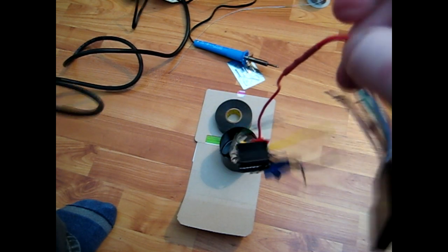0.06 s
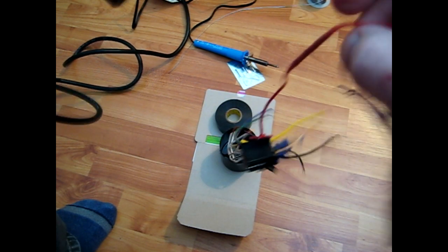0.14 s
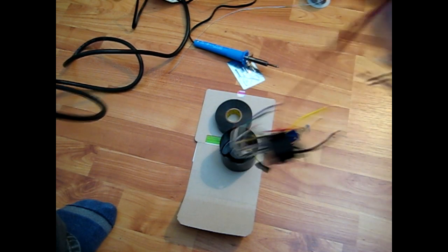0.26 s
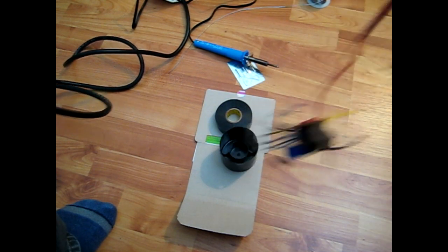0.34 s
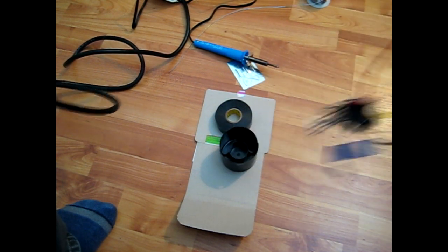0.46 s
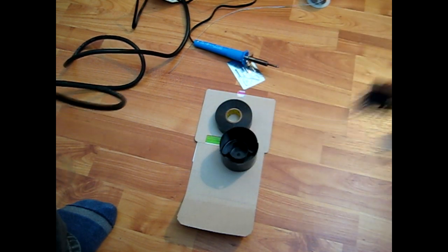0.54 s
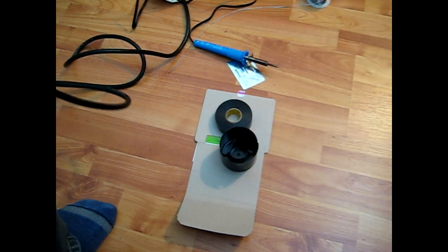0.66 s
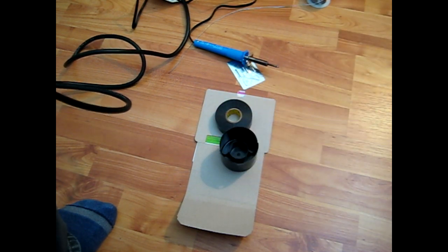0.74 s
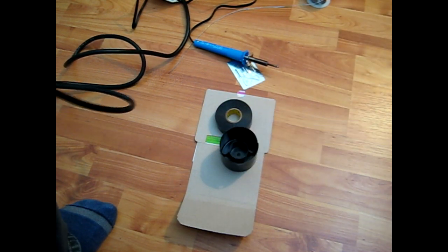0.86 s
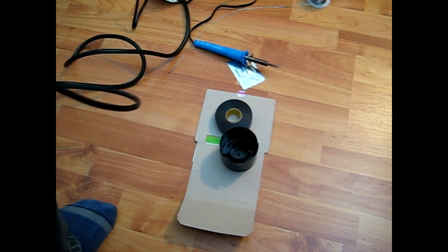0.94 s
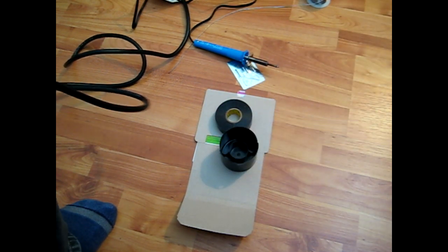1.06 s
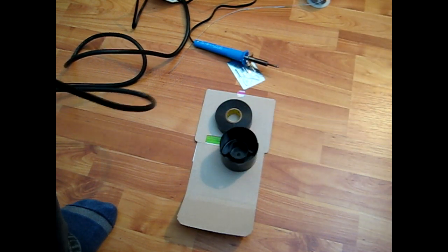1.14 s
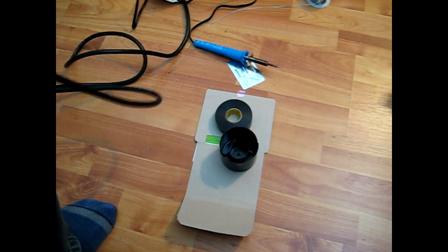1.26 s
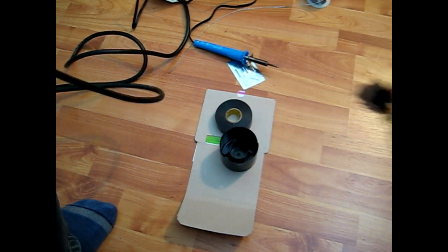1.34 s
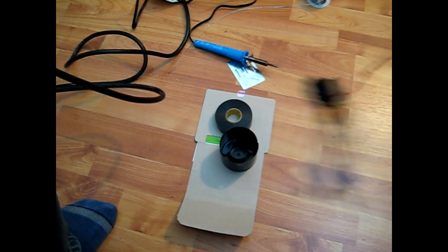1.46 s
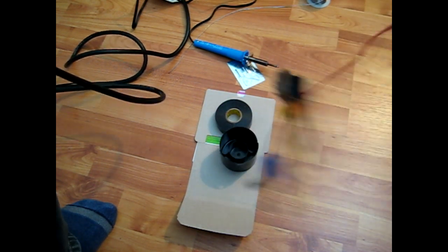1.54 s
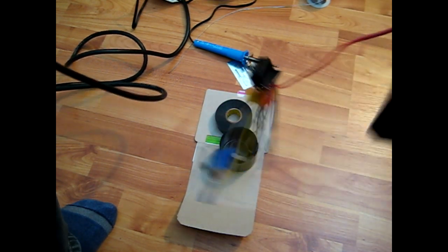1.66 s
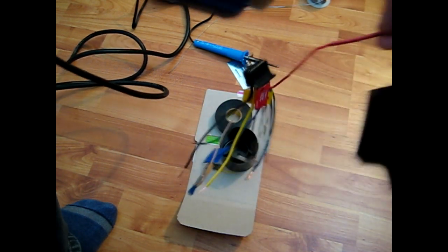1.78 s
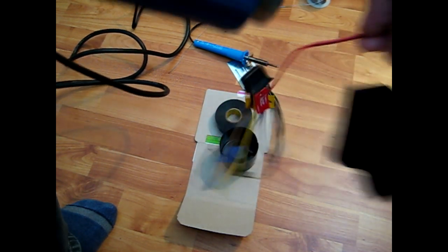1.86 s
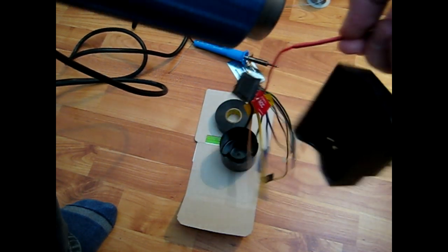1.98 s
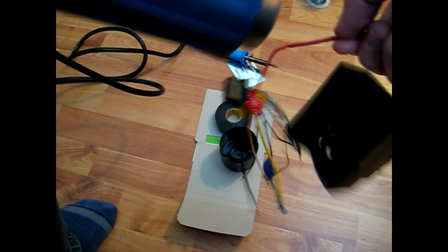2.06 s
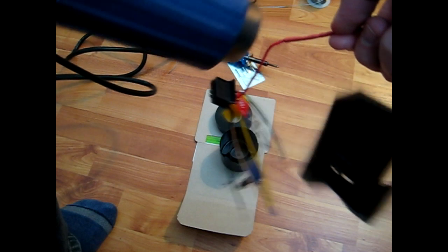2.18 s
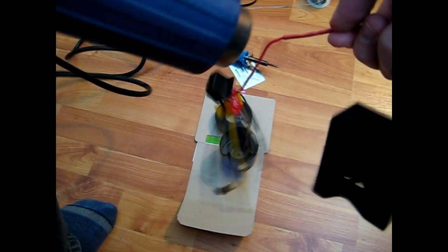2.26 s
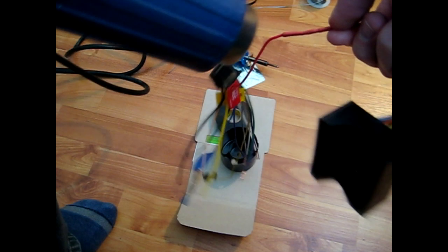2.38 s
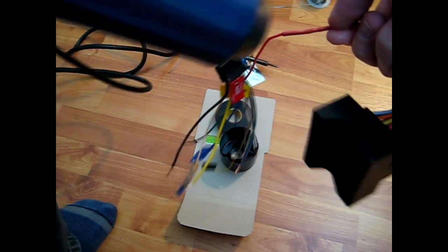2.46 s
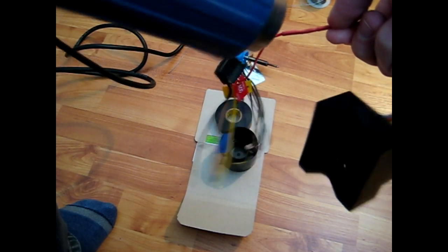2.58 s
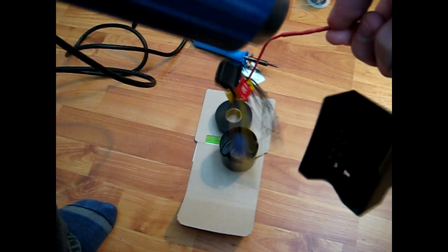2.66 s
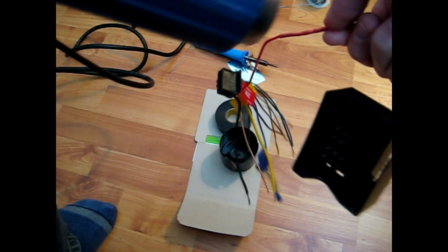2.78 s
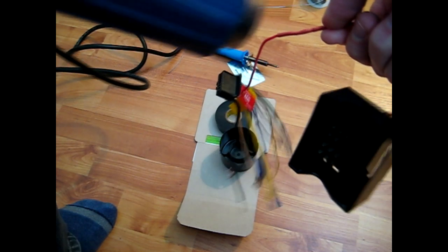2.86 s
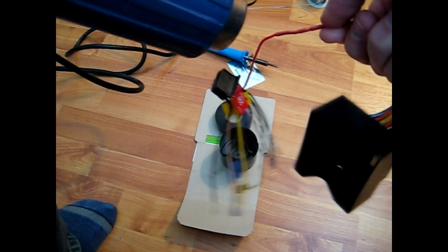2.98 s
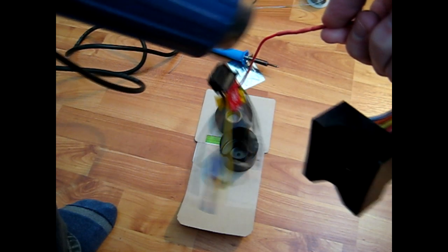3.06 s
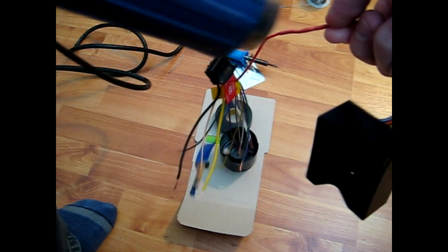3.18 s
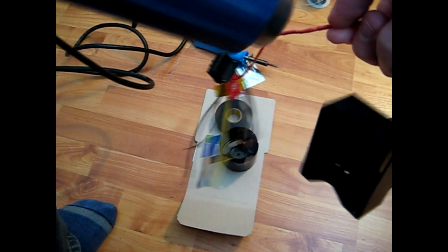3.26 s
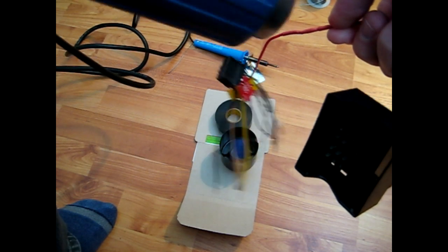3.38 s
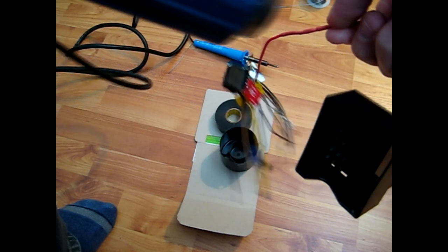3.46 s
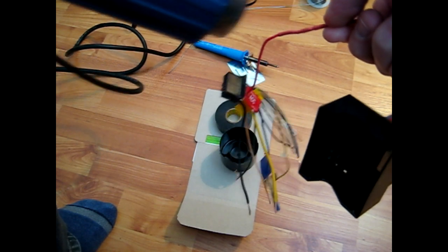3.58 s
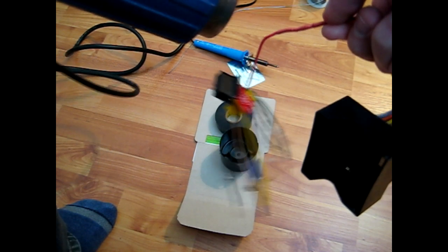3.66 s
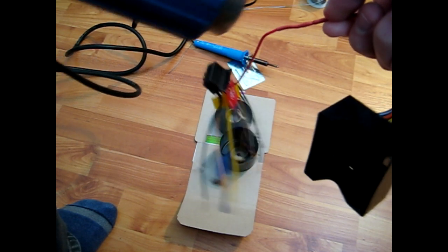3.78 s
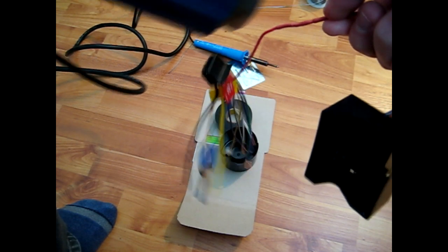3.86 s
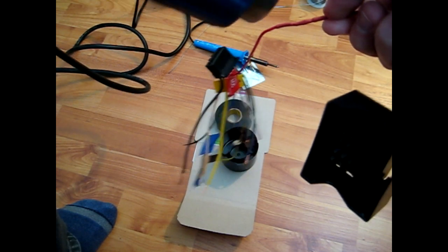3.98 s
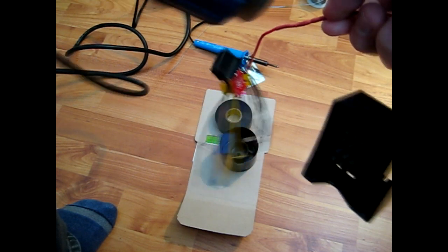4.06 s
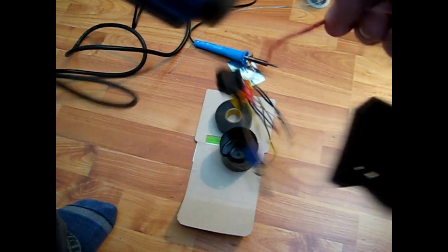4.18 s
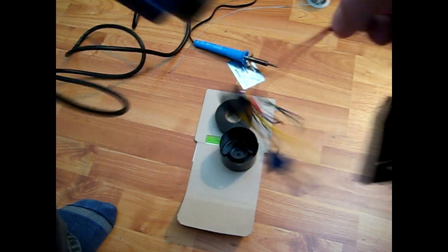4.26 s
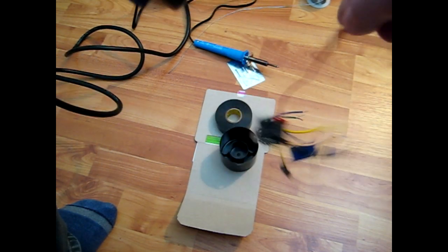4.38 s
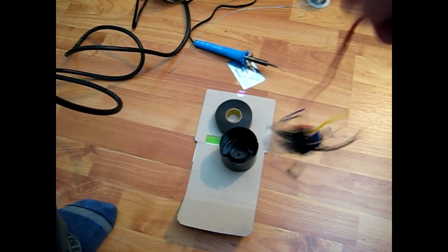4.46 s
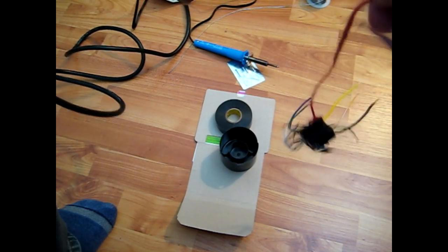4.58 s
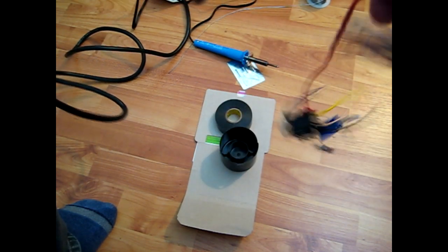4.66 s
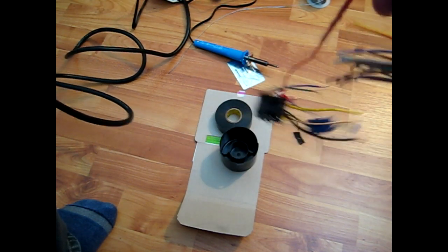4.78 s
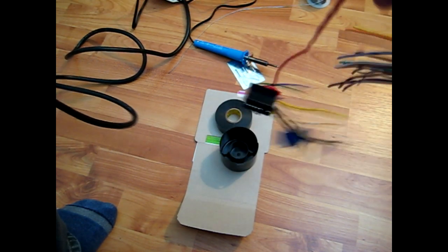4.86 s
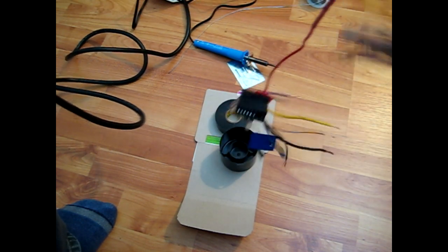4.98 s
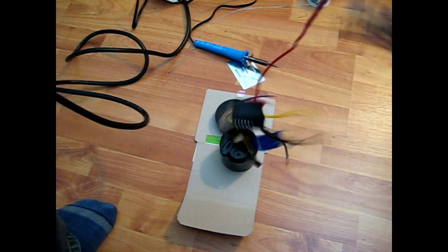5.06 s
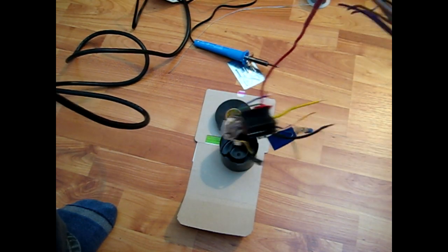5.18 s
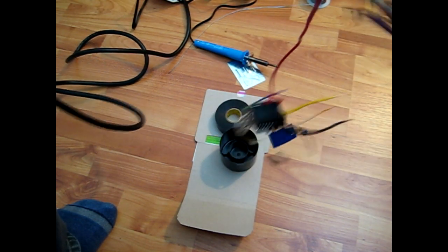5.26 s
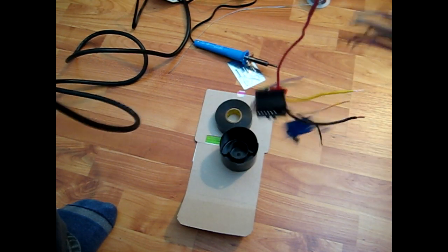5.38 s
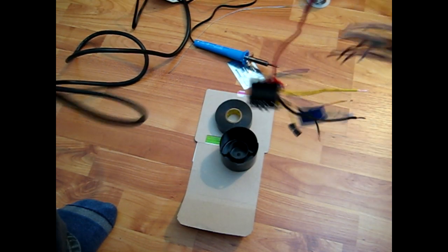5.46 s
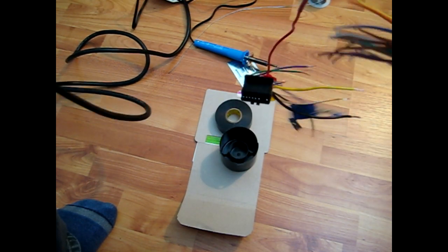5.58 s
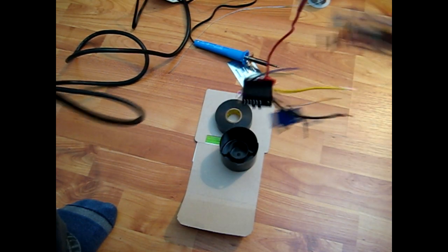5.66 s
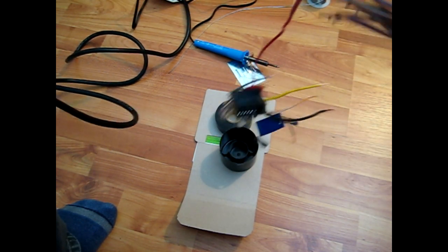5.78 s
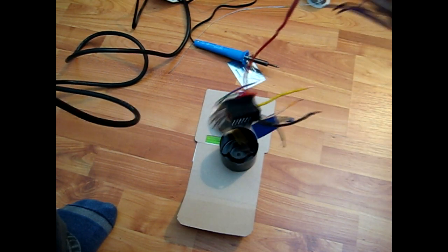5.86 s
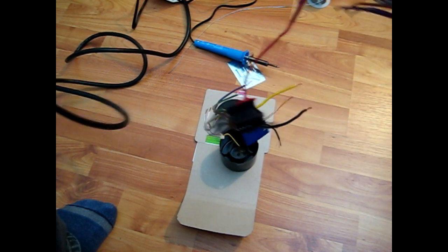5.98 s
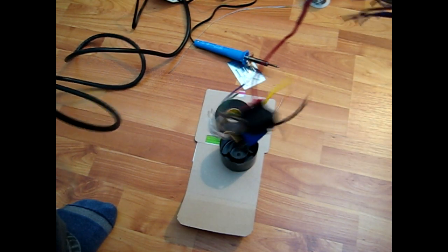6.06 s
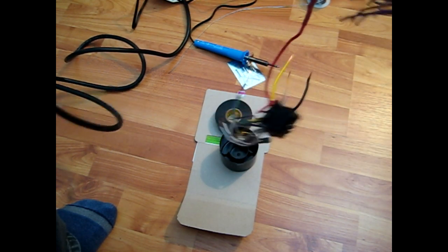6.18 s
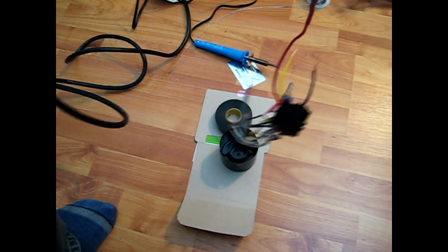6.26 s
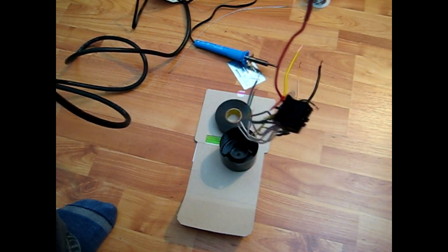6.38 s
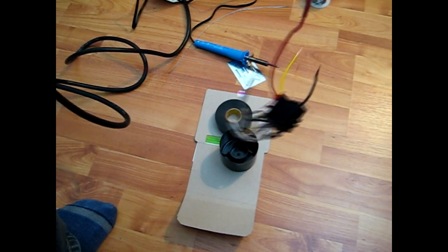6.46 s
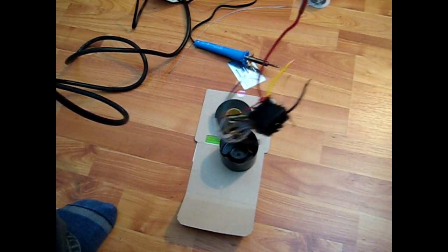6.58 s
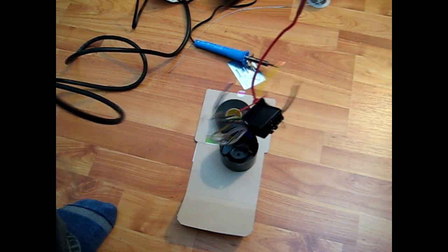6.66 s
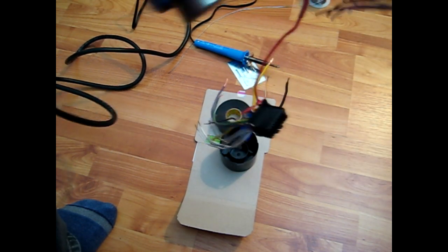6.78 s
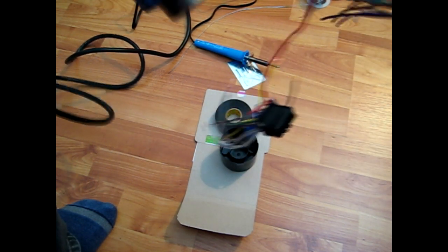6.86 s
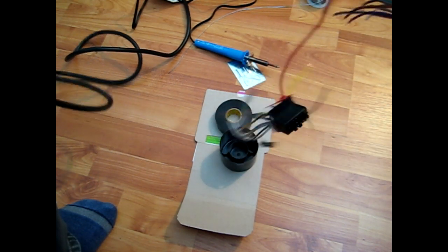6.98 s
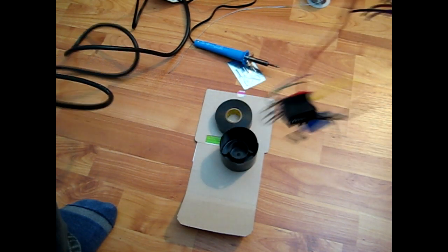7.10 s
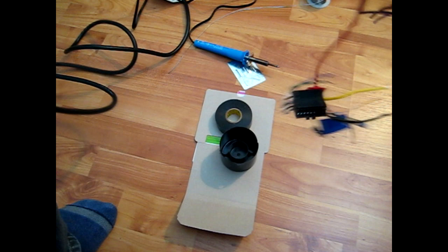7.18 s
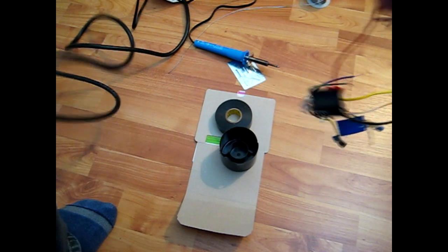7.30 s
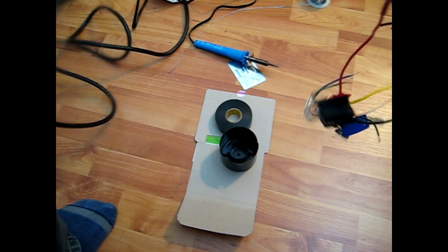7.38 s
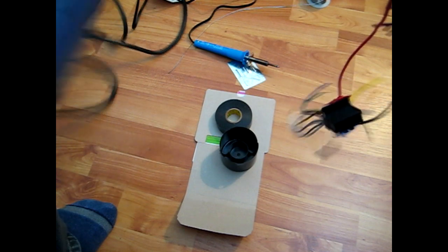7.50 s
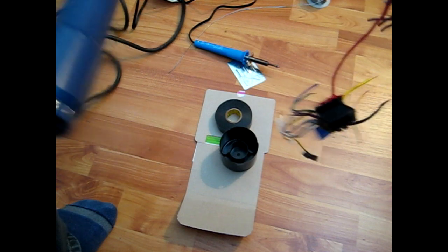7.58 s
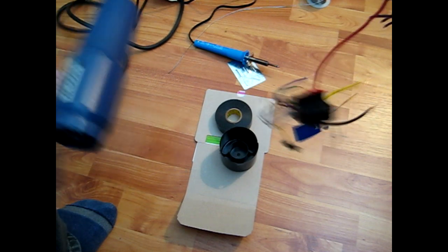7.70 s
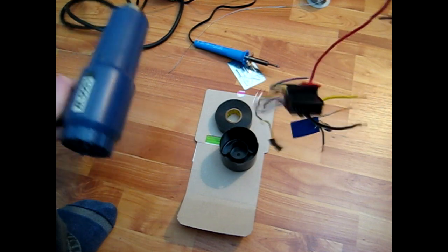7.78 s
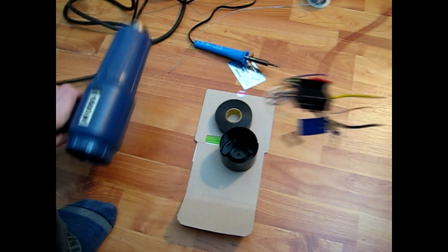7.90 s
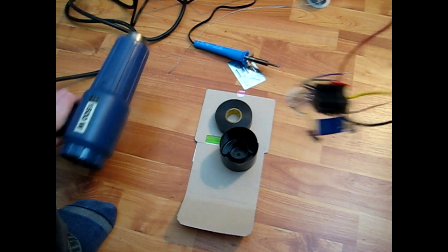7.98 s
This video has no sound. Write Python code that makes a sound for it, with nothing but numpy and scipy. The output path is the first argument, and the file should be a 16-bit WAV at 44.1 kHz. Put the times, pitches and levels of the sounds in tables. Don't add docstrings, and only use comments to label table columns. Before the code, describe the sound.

Close to the microphone in a quiet room, an electric heat gun blows a steady airy roar with a fan and motor whine, its tone shifting slightly as it moves. Late on, the power cuts, the whine slides down and the air collapses. The plastic casing then knocks sharply on the wooden floor, scrapes briefly, taps again and gives a thin squeak.

```python
import sys
import numpy as np
from scipy import signal
from scipy.io import wavfile
from scipy.ndimage import uniform_filter1d

SR = 44100
rng = np.random.default_rng(int(sys.argv[2]) if len(sys.argv) > 2 else 0)


def boost(x):
    u = np.asarray(x, float) / 20
    return 10 ** u


def generate_wav(signal):
    frames = np.transpose(np.atleast_2d(signal))
    scaled = np.clip(frames, -1, 1) * 32767
    pcm = np.round(scaled).astype(np.int16)
    wavfile.write(sys.argv[1], SR, pcm)


N = 354123

# (frequency [Hz], density [dB per Hz])
ROOM = [(18, -36), (60, -15), (150, -15.5), (300, -9), (600, -11), (1100, -11.5), (2100, -20), (3000, -26),
        (4500, -25), (7000, -23), (15000, -37)]
# (frequency [Hz], level [dB])
HUM = [(355.3, -43), (293, -49.5), (448, -76), (7558, -54.5)]
ROOM_DB = -42

# (time [s], pitch of third partial [Hz], level [dB])
SQUEAK = [
    (7.86, 5520, -52),
    (7.878, 5662, -41),
    (7.93, 5810, -35),
    (7.974, 5730, -31.5),
    (8.004, 5800, -46),
    (8.03, 5818, -48),
]
# (multiple, level [dB])
SQUEAK_PARTIALS = [(3, 0), (5, -30), (6, -31), (7, -36)]
# (time of full pressure [s], level [dB], rise [dB/s], fall [dB/s])
STROKES = [
    (7.445, -29.5, 900, 150),
    (7.5, -26.5, 170, 130),
    (7.625, -37, 60, 300),
    (7.8, -37.5, 300, 200),
    (7.4, -40, 10, 26),
    (7.84, -43, 4, 130),
]
# (frequency [Hz], density [dB per Hz])
RASP = [(120, -43), (300, -10), (600, 0), (1200, 1), (2200, -0.5), (3000, -0.5), (4200, 3.5), (5600, 0.5),
        (8000, -14), (14000, -29)]
# (time [s], peak [dB], casing ring [dB], floor ring [dB])
KNOCKS = [(7.4366, 3, -2.5, -6.5), (7.4376, -4, 2, -11), (7.4394, -1.5, 4, -18), (7.4427, -12.5, -3, -6),
          (7.4615, -19, 0, -12), (7.5117, -12, 3, -15), (7.7903, -11.5, -3.5, 0.5), (7.7928, -19, -1, -4),
          (7.7952, -19, -5, 2), (7.803, -27, -10, 2), (7.856, -27, -13, 2), (7.14, -21, 0, -6)]
# (frequency [Hz], level [dB], decay by 60 dB [s])
CASING = [(1800, -9, .006), (2270, -7, .008), (2900, -4, .007), (3440, -1, .009), (4100, -2, .012),
          (4900, -6, .008), (6200, -10, .005), (8260, -11, .005), (11000, -16, .004)]
# (frequency [Hz], level [dB], decay by 60 dB [s])
BOARDS = [(486, -14, 0.038), (720, -10.5, 0.028), (1000, -3, 0.014), (1350, -2, 0.01)]
SNAP_DB, SNAP_S = 2, .00006

# (time [s], speed [turns/s])
SPEED = [(0.03, 194.3), (0.17, 193.6), (0.84, 194.0), (1.57, 193.7), (2.47, 195.1), (3.49, 195.4),
         (3.91, 195.1), (4.08, 195.7), (4.72, 194.0), (5.65, 193.6), (6.0, 192.6), (6.61, 192.2)]
OFF_S, COAST_S, SET_DOWN_S = 6.625, .518, 7.42
LEAD = dict(order=(8, 16, 15, 45, 40, 5))
# (level [dB], change turned to the work [dB])
LEAD_DB = [(-28, -1.5), (-29.5, -2.5), (-35.5, -1), (-39.5, 4.5), (-42.5, -0.5), (-48, 6)]
# (multiple, time [s], half length [s], change [dB])
SWELLS = [(8, .35, .6, -9), (16, 1, .25, 4), (16, 6, .25, 4), (16, 3.75, .5, -3), (15, 1.6, .4, -8),
          (15, 3.35, .3, -5), (15, 6.4, .5, -8), (15, 4.5, .2, 4), (15, 5.4, .3, 3), (45, 0, .2, -5),
          (45, 1, .2, -5), (45, 1.75, .25, -10), (45, 2.15, .35, 3), (45, 4.35, .3, -4), (45, 5, .3, 4),
          (45, 6.3, .25, -5), (40, 1.35, .3, 4), (40, 1.8, .25, -7), (40, 4.35, .25, 4), (40, 4.85, .3, -4),
          (5, 1.1, .5, -4), (5, 6.3, 1.2, 11)]
WHINE = dict(first=28, last=77, knee=48)
WHINE_DB, WHINE_FALL_DB, WHINE_SCATTER_DB = -48, .72, 2.5
# (multiple, level [dB])
SLOTS = [(32, -43), (35, -42), (42, -41), (44, -45), (54, -48), (55, -48), (60, -51)]
# (multiple, level [dB])
FAINT = [(9, -47), (10, -51), (13, -48), (14, -53), (17, -45), (20, -47), (25, -50), (80, -66), (85, -72),
         (90, -70)]
# (multiple, level [dB])
BARS = [(14, -42), (20, -38), (30, -34), (35, -42), (48, -45), (52, -45), (55, -44), (80, -45), (90, -47)]
# (frequency [Hz], width [Hz], level [dB])
SHELL = [(2600, 400, 3), (6300, 500, 5), (7500, 400, 2), (9000, 800, 6), (10500, 900, 7)]
FREED_DB, FREED_S, FADE_DB_PER_S2 = 1, .07, 100
BLADE_FALL = 1.0
BLADE_BARREL, BLADE_PIPE = (1270, 220, 10), (590, 50, 6)
BLADE_END_S, BLADE_END_DB_PER_S = 7.17, 170
TICK_S, TICK_DB, TICK_RISE, TICK_FALL = 7.29, -34, 90, 120

# (time [s], flow [dB], nozzle toward the work [0-1], barrel whistle [dB],
# nozzle hump [Hz], nozzle hump [dB])
HOLD = [(0, -18, 0.02, -2, 5240, -18), (.3, -18, 0.28, 0, 5100, -1), (.7, -20, 0.17, -0.5, 4020, 5),
        (1.05, -20, 0, 2.5, 4000, -1), (1.4, -18, 0.17, 1, 4000, -3), (1.8, -17.5, 0.52, 1.5, 4180, -2.5),
        (2.4, -17.5, 0.74, -1, 4100, -7), (2.9, -16.5, 0.9, -3.5, 4060, -10),
        (3.3, -18, .9, 0.5, 3900, -2.5), (3.75, -17.5, 1, 0, 4020, -2), (4.1, -18, 0.4, 2.5, 4250, -7),
        (4.4, -19.5, 0, 4.5, 4300, -5), (4.8, -20, 0.09, 3.5, 4300, 0.5), (5.3, -20, 0.13, 2.5, 4400, 2.5),
        (5.9, -19.5, 0.25, 0, 4300, 2), (6.3, -19.5, 0.18, -1, 4160, 0.5), (6.62, -17.5, 0.4, -2, 4230, -5)]
# (frequency [Hz], density [dB per Hz])
STREAM = [(30, -36), (180, -36), (420, -15.5), (800, -13.5), (1150, -6.5), (1600, -17.5), (2100, -12.5),
          (2350, -17), (2600, -13), (4400, -11.5), (5600, -19.5), (6300, -19.5), (9600, -25), (15000, -37)]
# (as a rule [dB], turned to the work [dB], early coast [dB], late coast [dB])
ANSWER = dict(flow=(0, 0, -2.5, -15.5), pipe=(-1, 5, 15.5, -2.5), barrel=(0, 0, 3.5, -29),
          grille=(3, -20.5, 5.5, -30), vent=(2.5, -4.5, -17, 6), nozzle=(0, 1, -16, -11),
          dip=(2, 0.7, 3, -9), bright=(-2, 0.5, 7, 5.5))
# (time [s], half length [s], depth [dB])
SHADOWS = [
    (.4, 0.25, 6),
    (2.094, 0.43, 6),
    (3.7, 0.34, 2.5),
    (4.7, 0.41, 2),
]
EARLY_S, LATE_S = 0.24, 0.38
PIPE, BARREL = (560, 150, -7), (1282, 85, 13)  # (Hz, width Hz, dB)
GRILLE, VENT = (3260, 790, 2.1), (4950, 200, -4.5)  # (Hz, width Hz, dB)
DIP, NOZZLE_WIDTH = (3510, 730), 750
TOP_HZ, TOP_DB = 8800, 19

EDGE_HZ, CEILING = 15000, .92


def evened(x):
    return x / np.sqrt(np.mean(x ** 2) + 1e-20)


def read(points, hz):
    f, value = np.transpose(points)
    return np.interp(np.log(hz + 1), np.log(f + 1), value)


def columns(rows, t):
    s, *values = np.transpose(rows)
    return [np.interp(t, s, v) for v in values]


def add(mix, s, sound):
    part = mix[round(s * SR):][:len(sound)]
    part += sound[:len(part)]


def peak(t, s, db, rise, fall):
    return db - np.where(t < s, rise * (s - t), fall * (t - s))


def swell(t, s, half):
    return np.maximum(1 - abs(t - s) / half, 0)


def grid(size):
    hop = size // 4
    return np.fft.rfftfreq(size, 1 / SR)[:, None], np.arange(N // hop + 5) * hop / SR


def patches(shape, bins, frames):
    x = uniform_filter1d(rng.standard_normal(shape), size=bins, axis=0)
    return evened(uniform_filter1d(x, size=frames, axis=1))


def noise(height, patchy_db):
    a, b = rng.standard_normal((2,) + height.shape)
    size = 2 * len(height) - 2
    uneven = boost(patchy_db * patches(height.shape, bins=12, frames=16))
    z = (a + 1j * b) * height * uneven * np.sqrt(3 / size)
    return signal.istft(z, nperseg=size, noverlap=3 * size // 4)[1][:N]


def unit(height):
    return height / np.sqrt(np.mean(height ** 2, axis=0))


def hump(hz, centre_hz, width, db):
    return boost(db) ** 2 / (1 + (2 * (hz - centre_hz) / width) ** 2) ** 1.57


def room():
    hz, frames = grid(size=2048)
    t = np.arange(N) / SR
    hum = sum(np.sqrt(2) * boost(db) * np.sin(2 * np.pi * (f * t + rng.random())) for f, db in HUM)
    return hum + boost(ROOM_DB) * noise(unit(boost(read(ROOM, hz))) + 0 * frames, patchy_db=2.5)


def squeak():
    t = np.arange(SQUEAK[0][0], N / SR, 1 / SR)
    hz, level_db = columns(SQUEAK, t)
    turns = np.cumsum(hz) / SR / SQUEAK_PARTIALS[0][0]
    tone = sum(boost(db) * np.sin(2 * np.pi * k * turns) for k, db in SQUEAK_PARTIALS)
    fade_in = np.clip((t - t[0]) / .01, 0, 1)
    out = np.zeros(N)
    add(out, t[0], np.sqrt(2) * boost(level_db) * tone * fade_in)
    return out


def slide():
    hz, frames = grid(size=256)
    t = np.arange(N) / SR
    stroke_db = np.max([peak(t, *row) for row in STROKES], axis=0) + 5.0
    touching = np.clip((t - 7.3) / 0.059, 0, 1)
    rasp = noise(unit(boost(read(RASP, hz))) + 0 * frames, patchy_db=.5)
    return boost(stroke_db) * touching * rasp


def ringing(modes, t):
    out = np.zeros(len(t))
    for k, (f, db, t60) in enumerate(modes):
        hz = f * rng.uniform(0.93, 1.03)
        out += (-1) ** k * boost(db - 60 * t / t60) * np.sin(2 * np.pi * hz * t)
    return out


def knocks():
    out, t = np.zeros(N), np.arange(3000) / SR
    place = (t / SNAP_S - 3) ** 2
    flick = boost(SNAP_DB) * (1 - 2 * place) * np.exp(-place)
    for s, peak_db, casing_db, floor_db in KNOCKS:
        ring = boost(floor_db) * ringing(BOARDS, t) + boost(casing_db) * ringing(CASING, t)
        grit = uniform_filter1d(uniform_filter1d(rng.standard_normal(len(t)), size=4), size=3)
        crack = boost(-5 - 60 * t / .009) * grit
        onset = np.minimum(t / .0004, 1)
        blow = (ring / abs(ring).max() + crack) * onset - flick
        add(out, s, boost(peak_db) * blow)
    return out


def shaft(t):
    return columns(SPEED, t)[0] * np.exp(-np.maximum(t - OFF_S, 0) / COAST_S)


def lost_speed(t):
    return shaft(OFF_S) * (1 - np.exp(-np.maximum(t - OFF_S, 0) / COAST_S))


def freed(t):
    return np.clip((t - OFF_S) / FREED_S, 0, 1)


def coast_db(t):
    return FREED_DB * freed(t) - FADE_DB_PER_S2 * np.maximum(t - OFF_S - 2 * FREED_S, 0) ** 2


def leading_tones(t):
    lost_hz, since = lost_speed(t), np.maximum(t - OFF_S, 0)
    turned = columns(HOLD, t)[1]
    held = {k: db + turned_db * turned for k, (db, turned_db) in zip(LEAD["order"], LEAD_DB)}
    for k, s, half, db in SWELLS:
        held[k] = held[k] + db * swell(np.minimum(t, OFF_S), s, half)
    paths = {}
    for k, db in held.items():
        low_db = (k < 20) * lost_hz / 8
        echo = .6 + .4 * np.exp(2j * np.pi * k * lost_hz * .003)
        paths[k] = boost(db + coast_db(t) - low_db) * np.exp(2j * np.pi * rng.random()) * echo
    blades = LEAD["order"][0]
    blade_hz = blades * shaft(t)
    lit = np.sqrt(1 + (since > 0) * (hump(blade_hz, *BLADE_BARREL) + hump(blade_hz, *BLADE_PIPE)))
    blade = boost(peak(t, BLADE_END_S, held[blades], 0, BLADE_END_DB_PER_S))
    paths[blades] = blade * np.exp(-BLADE_FALL * since / COAST_S) * lit
    return paths


def whine_tones(t):
    many = np.arange(WHINE["first"], WHINE["last"] + 1)
    fall_db = WHINE_FALL_DB * np.maximum(many - WHINE["knee"], 0)
    comb_db = WHINE_DB - fall_db + WHINE_SCATTER_DB * rng.standard_normal(len(many))
    levels = {**dict(zip(many.tolist(), comb_db)), **dict(FAINT + SLOTS)}
    paths = {}
    for k, db in levels.items():
        rate, delay, phase = rng.random((3, 6, 1))
        cycles = 2.4 * (2 * rate - 1) * t + 0.00179 * delay * k * lost_speed(t) + phase
        paths[k] = boost(db + coast_db(t)) * np.exp(2j * np.pi * cycles).sum(0) / np.sqrt(len(rate))
    return paths


def brush_ticks(t, turns):
    level_db = peak(t, TICK_S, TICK_DB, TICK_RISE, TICK_FALL) + 5.3 * rng.standard_normal(len(t))
    ticks = np.diff(np.floor(turns), prepend=0) * boost(level_db)
    ring = boost(-60 * t[:900] / 0.046) * np.sin(2 * np.pi * 6600 * t[:900])
    return signal.oaconvolve(ticks, ring)[:len(t)]


def motor():
    t, slow = np.arange(round(SET_DOWN_S * SR)) / SR, np.arange(0, 7.5, 1 / 200)
    flutter = uniform_filter1d(rng.standard_normal(len(t)), size=1500)
    flutter = evened(uniform_filter1d(flutter, size=1500))
    turns = np.cumsum(shaft(t) + .07 * flutter) / SR
    paths = {**whine_tones(slow), **leading_tones(slow)}
    lost_hz = lost_speed(slow)
    for k, db in BARS:
        echo = .6 + .2 * np.cos(np.pi * k * lost_hz * .003 + 6 * rng.random())
        paths[k] = paths[k] + boost(db + coast_db(slow)) * np.clip(lost_hz / 110, 0, 1) ** 2 * echo
    for k in paths:
        rough = evened(uniform_filter1d(rng.standard_normal(len(slow)), size=5))
        paths[k] = paths[k] * boost(1.45 * rough)
        if k > LEAD["order"][0]:
            shell = sum(hump(k * shaft(slow), *row) for row in SHELL)
            paths[k] = paths[k] * np.sqrt(1 + freed(slow) * shell)
    turn = np.exp(2j * np.pi * turns).astype(np.complex64)
    out, power = np.zeros(len(t)), np.ones_like(turn)
    for k in range(1, int(max(paths)) + 1):
        power = power * turn
        if k in paths:
            out += np.sqrt(2) * (power * np.interp(t, slow, paths[k])).real
    return np.pad(out + brush_ticks(t, turns), (0, N - len(t)))


def collapse(t):
    return np.clip((t - OFF_S - EARLY_S) / LATE_S, 0, 1)


def answer(part, t):
    rule_db, turned_db, early_db, late_db = ANSWER[part]
    early = np.clip((t - OFF_S) / EARLY_S, 0, 1)
    return rule_db + turned_db * columns(HOLD, t)[1] + early_db * early + late_db * collapse(t)


def air():
    hz, t = grid(size=2048)
    flow_db, _, whistle_db, nozzle_hz, nozzle_db = columns(HOLD, t)
    treble = np.clip(np.log2((hz + 1) / 5000), 0, 1)
    power = unit(boost(read(STREAM, hz))) ** 2 * boost(2 * answer("bright", t) * treble)
    for (f, width, db), turn_db in ((PIPE, answer("pipe", t)),
                                    (BARREL, whistle_db + answer("barrel", t)),
                                    (GRILLE, answer("grille", t)),
                                    (VENT, answer("vent", t))):
        power = power + 10 * hump(hz, f, width, db + turn_db)
    power = power + 10 * hump(hz, nozzle_hz, NOZZLE_WIDTH, nozzle_db + answer("nozzle", t))
    dip_db = answer("dip", t) + sum(db * swell(t, s, half) for s, half, db in SHADOWS)
    dulled_db = TOP_DB * np.maximum(np.log2((hz + 1) / TOP_HZ), 0) * collapse(t)
    height = np.sqrt(power) * boost(-dip_db * hump(hz, *DIP, 0) - dulled_db)
    drift = patches(height.shape, bins=18, frames=45)
    stopped = np.clip((7.5 - t) / 0.15, 0, 1)
    height = height * boost(.6 * drift) * stopped
    return boost(-2.5) * noise(height * boost(flow_db + answer("flow", t)), patchy_db=1.51)


def scene():
    gun = air() + motor()
    ducked = boost(-9.0 * np.clip((7.05 - np.arange(N) / SR) / .35, 0, 1))
    return np.tile(gun + ducked * room() + slide() + knocks() + squeak(), (2, 1))


def band_limit(x):
    return signal.sosfilt(signal.butter(12, 15120, fs=SR, output="sos"), x)


def record(dry):
    capsule = signal.lfilter(*signal.butter(1, 60, "high", fs=SR), dry)
    clipped = np.clip(capsule, -CEILING, CEILING)
    edge = signal.firwin(255, EDGE_HZ, window=("kaiser", 9), fs=SR)
    limited = signal.oaconvolve(clipped, edge[None], "same", axes=1)
    return band_limit(limited)


dry = scene()
out = record(dry)
generate_wav(out)
```